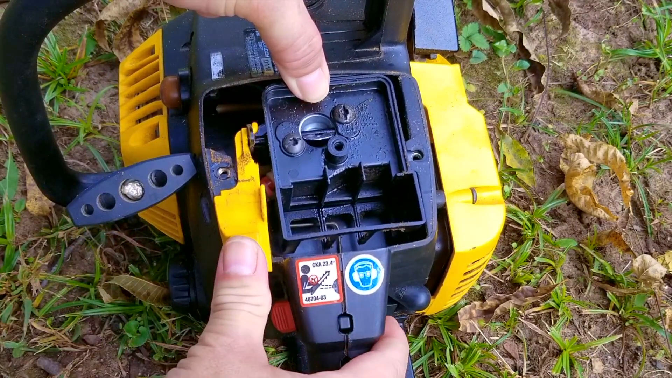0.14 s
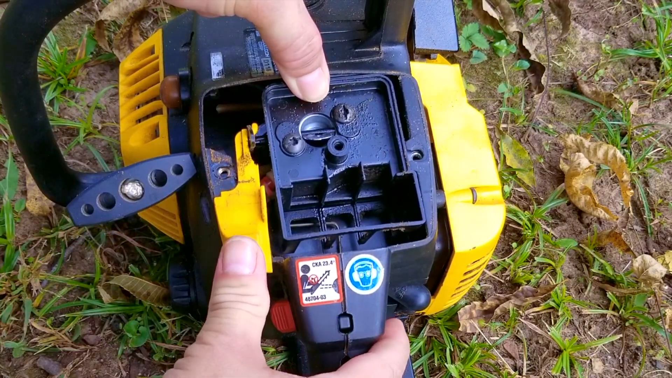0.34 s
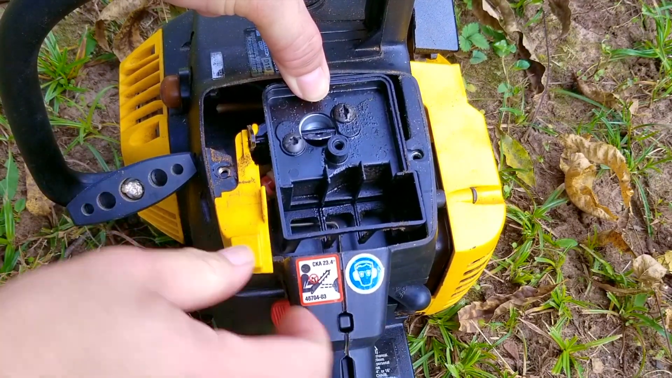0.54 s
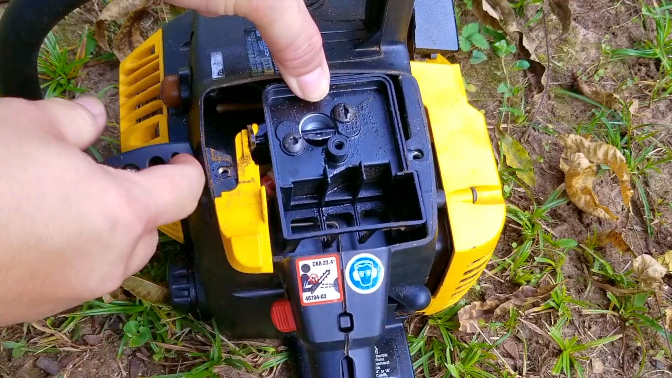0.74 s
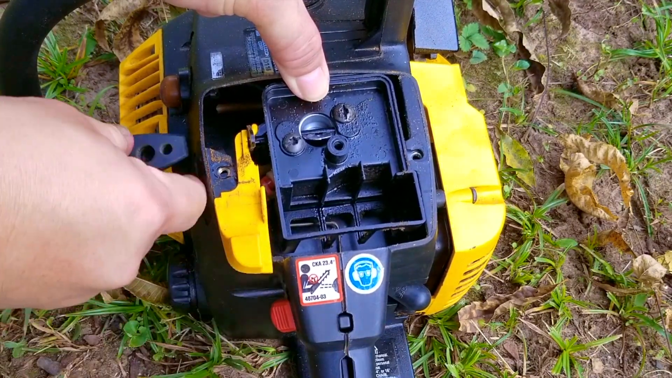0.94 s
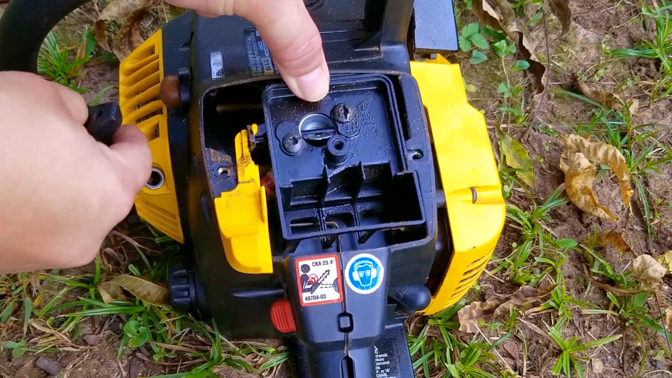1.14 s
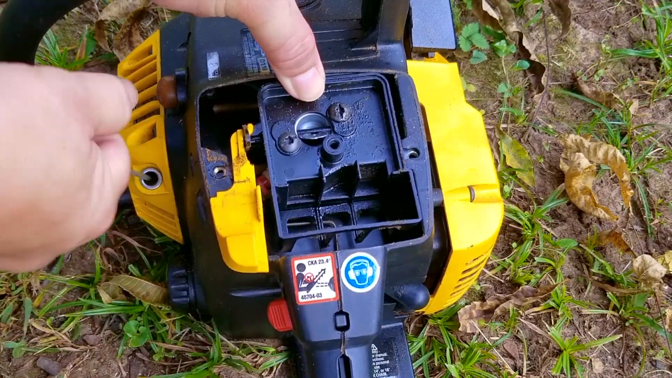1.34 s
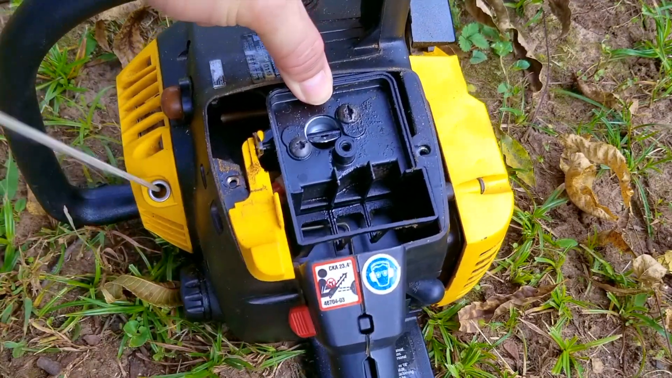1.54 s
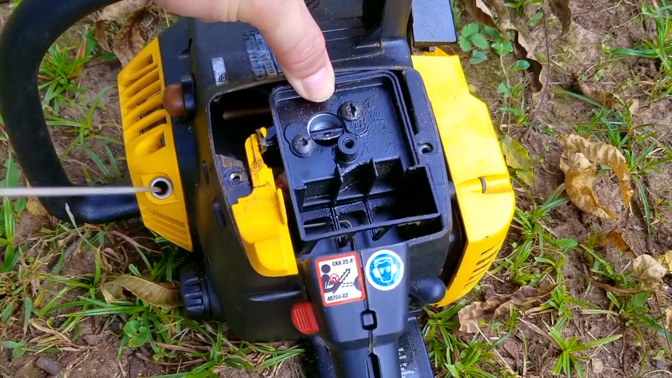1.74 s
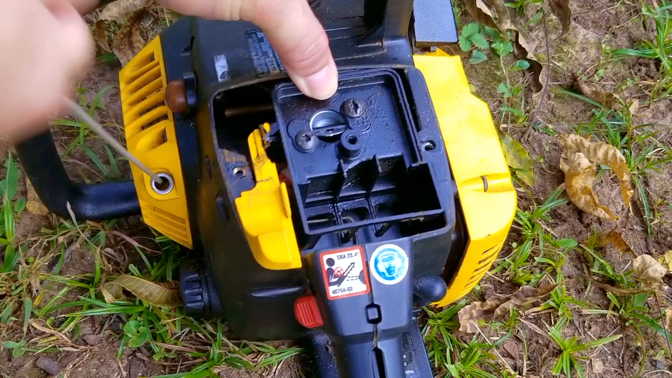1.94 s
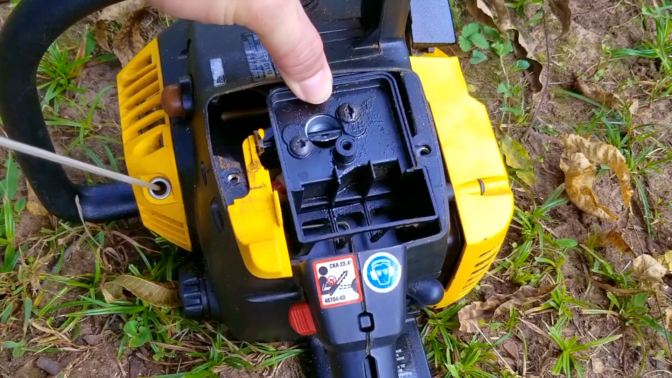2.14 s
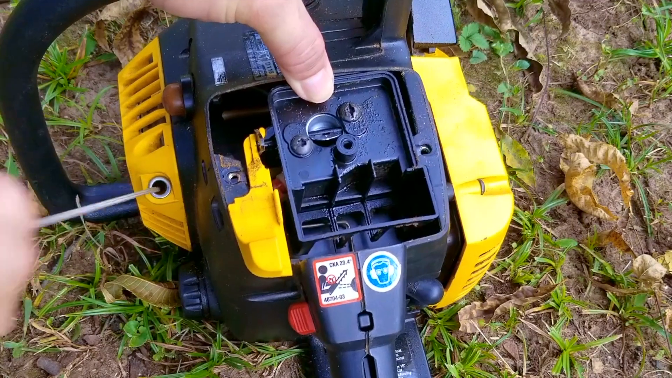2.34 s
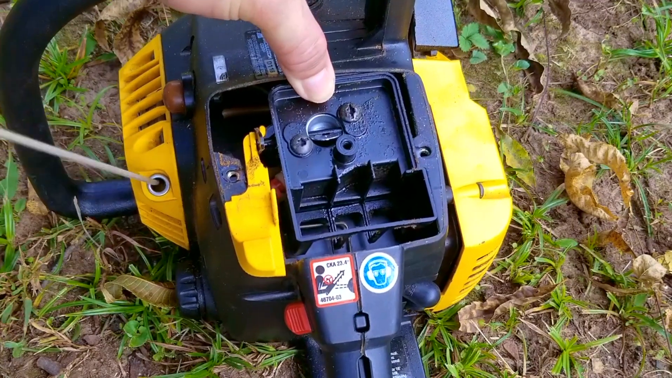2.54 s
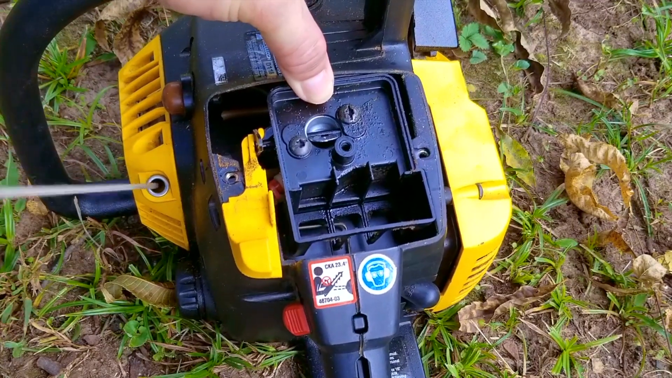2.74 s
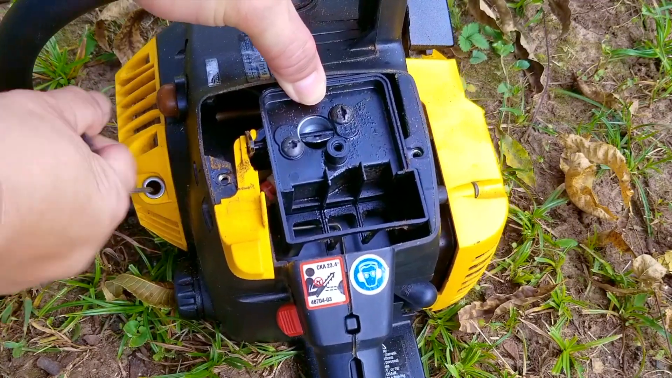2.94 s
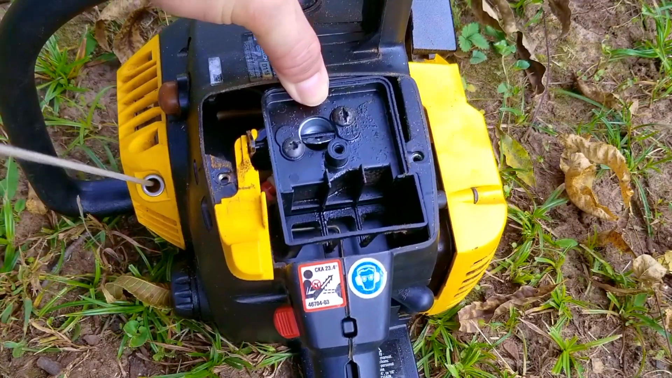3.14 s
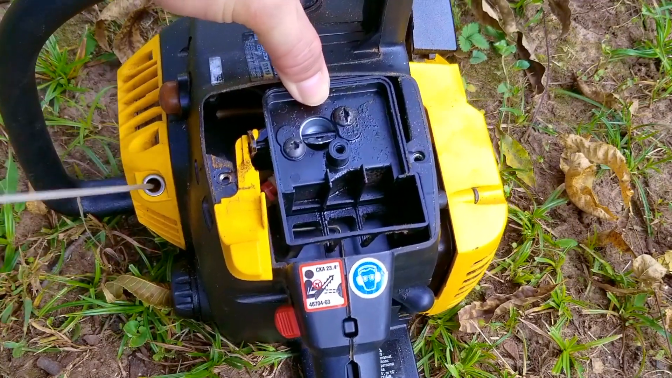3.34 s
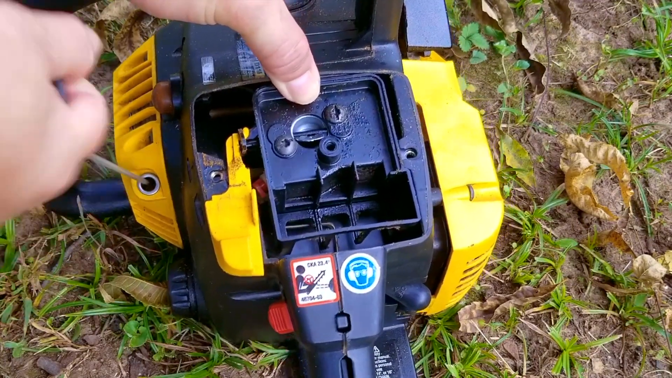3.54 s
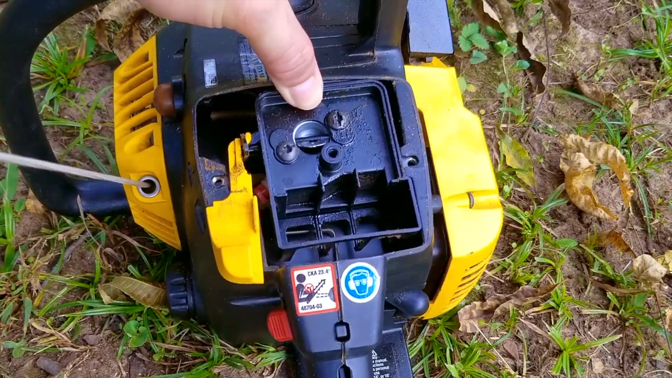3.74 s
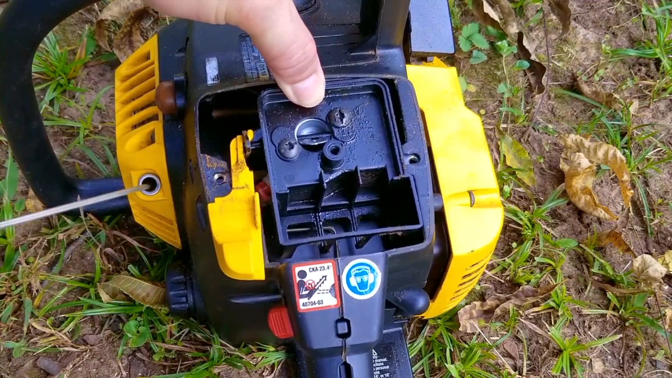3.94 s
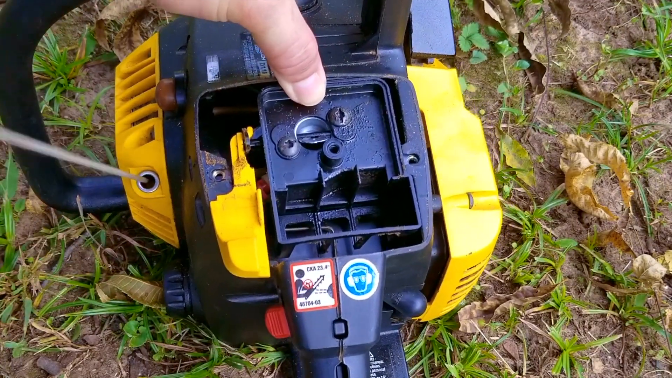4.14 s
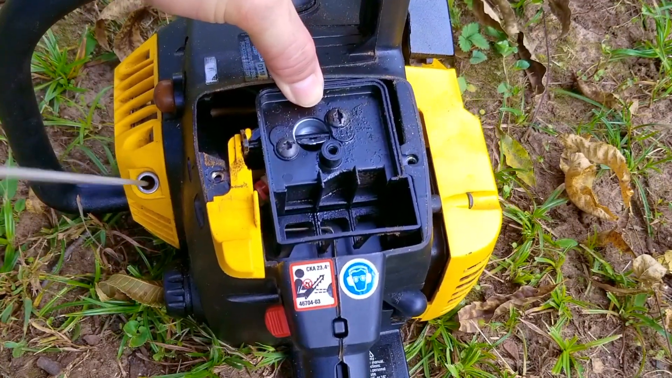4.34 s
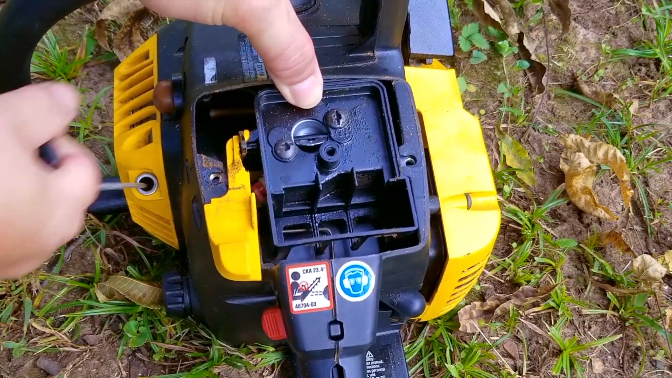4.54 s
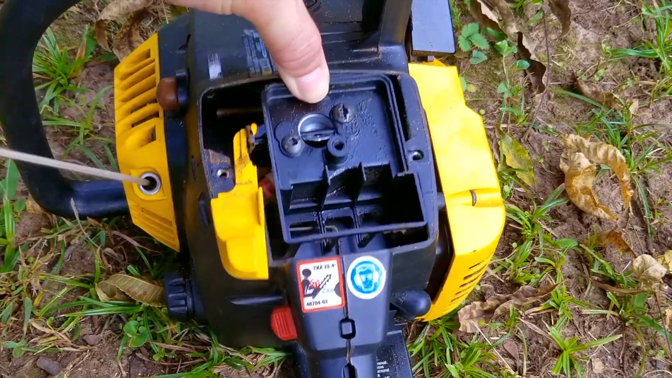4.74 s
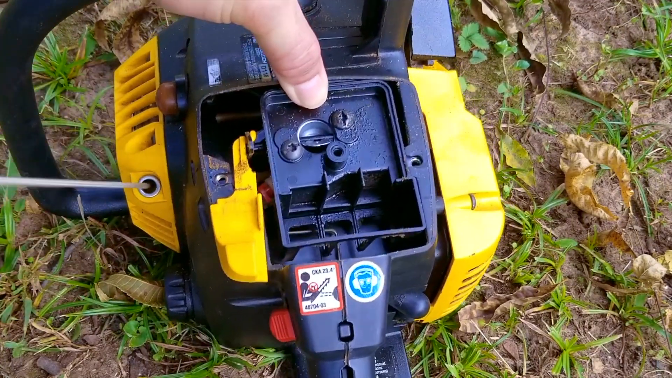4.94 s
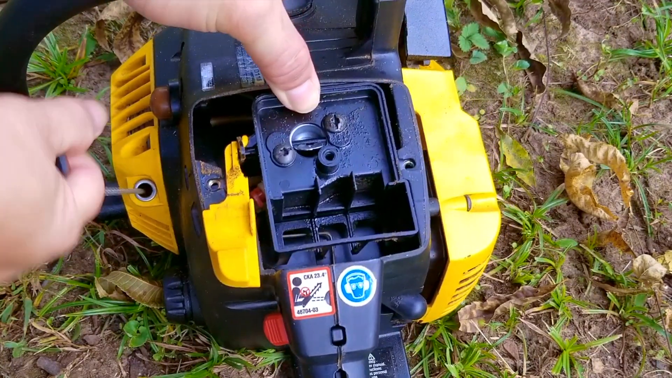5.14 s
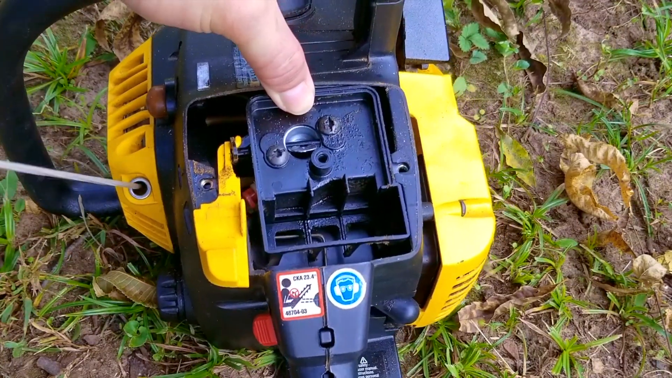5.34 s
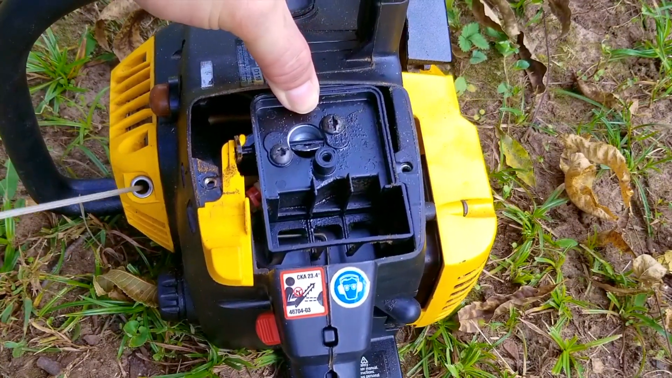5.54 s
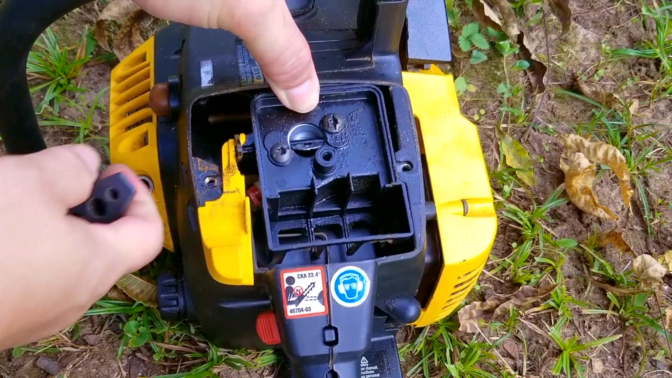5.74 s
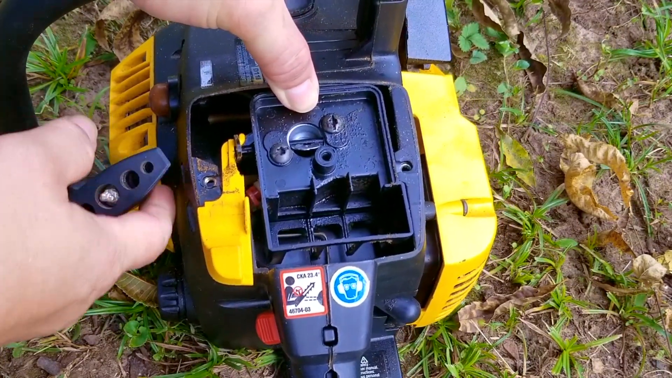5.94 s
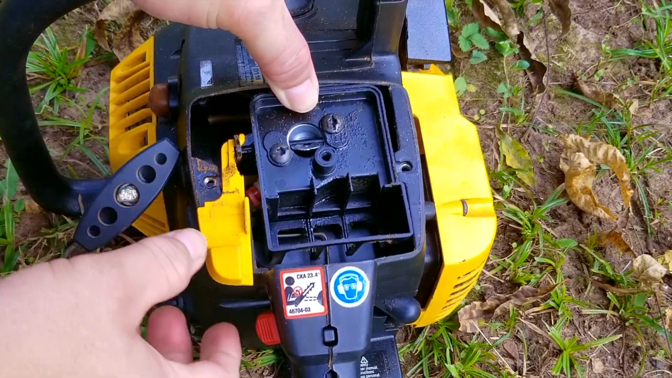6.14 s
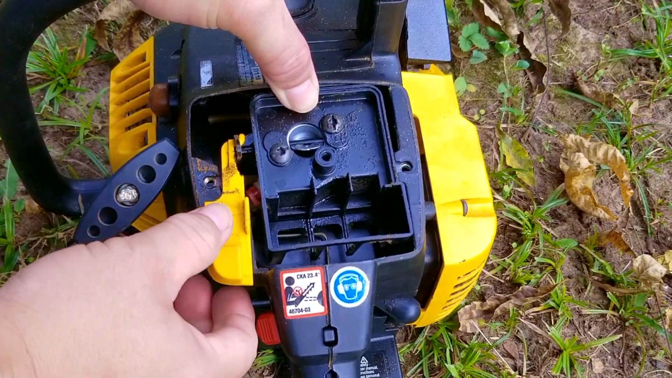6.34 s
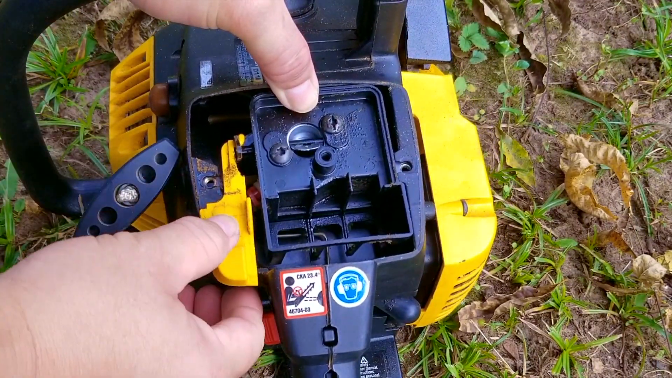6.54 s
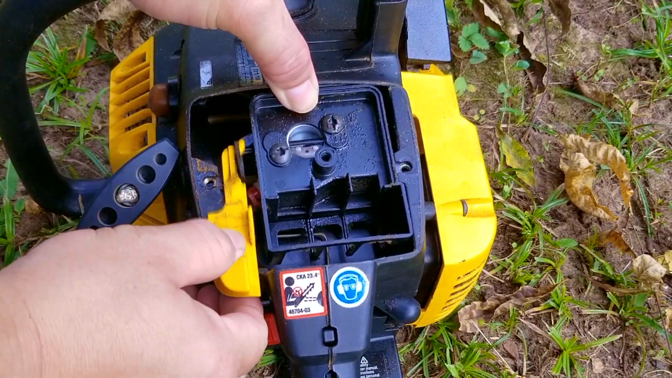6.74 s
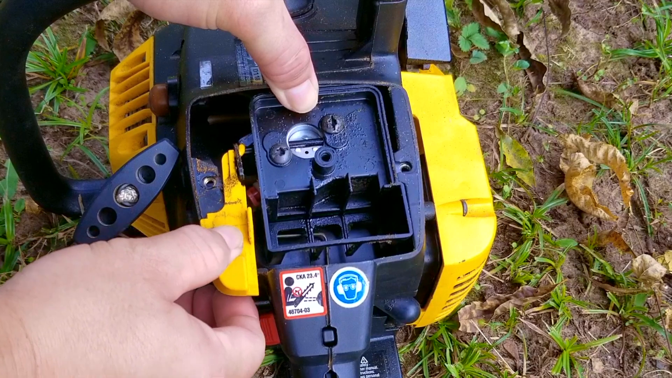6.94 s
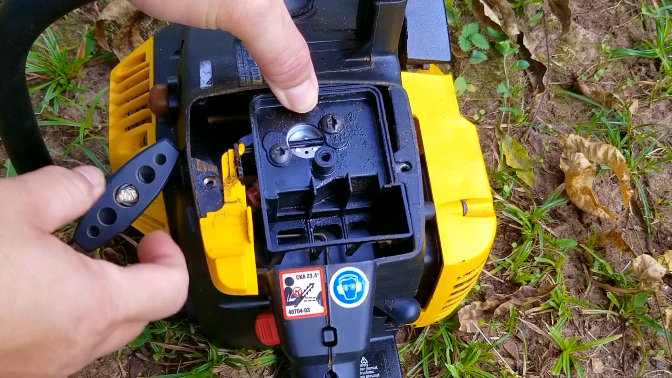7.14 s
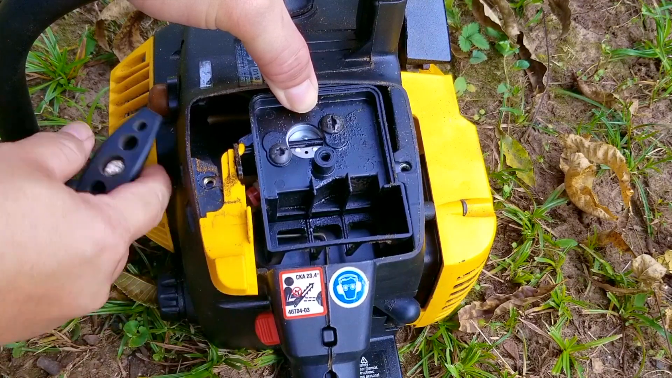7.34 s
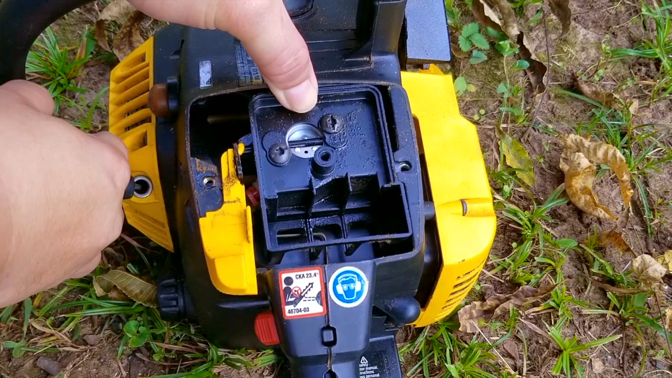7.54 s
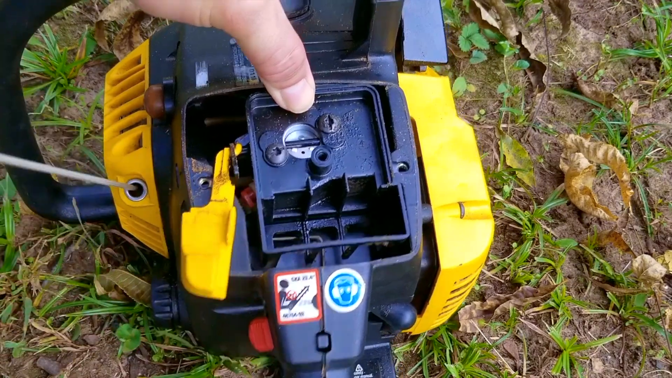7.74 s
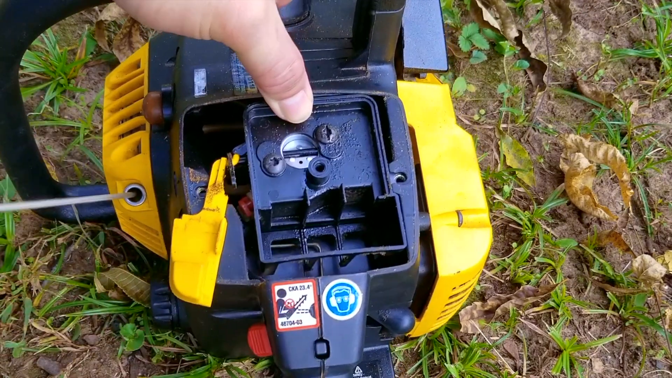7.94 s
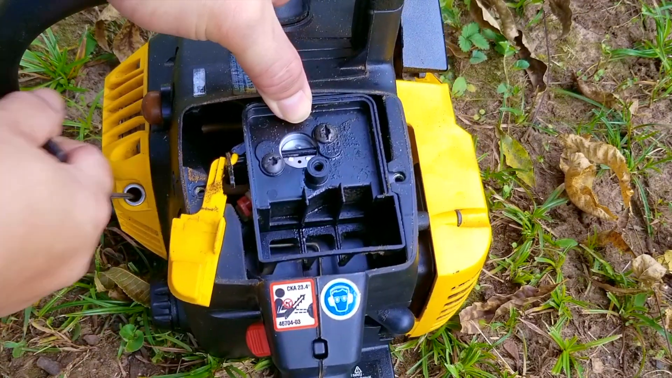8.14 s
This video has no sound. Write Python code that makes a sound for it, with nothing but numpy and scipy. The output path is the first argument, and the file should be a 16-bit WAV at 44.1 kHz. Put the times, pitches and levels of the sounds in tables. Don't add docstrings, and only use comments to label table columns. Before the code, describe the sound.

Close outdoors, a small two-stroke engine is cranked by a pull cord. After a quiet second, eight rapid pulls come about half a second apart, each a knock, then a slowing run of dull thuds and sharp airy puffs, then a rasping, ticking cord rewind. It never fires. A pause, a crisp plastic lever snap, then two more pulls. Faint traffic rumble; engine strongly to the left.

```python
import sys
import numpy as np
from scipy import signal
from scipy.fft import rfft, irfft, next_fast_len
from scipy.io import wavfile
from scipy.ndimage import uniform_filter1d

SR = 44100
rng = np.random.default_rng(int(sys.argv[2]) if len(sys.argv) > 2 else 0)


def convert_level_to_amplitude(level_db):
    exponent = np.asarray(level_db, float) / 20
    return 10 ** exponent


def wav_record(signal):
    frames = np.transpose(np.atleast_2d(signal))
    bounded = np.clip(frames, -1, 1)
    quanta = np.round(bounded * 32767).astype(np.int16)
    wavfile.write(sys.argv[1], SR, quanta)


N = 365588

# start_s [s], thud_db [dB], intake_ring_db [dB], puff_db [dB], puff_length_s [s]
PULLS = [
    (1.3258, -16, -20.5, -22, 0.0077),
    (1.8817, -21, -24.5, -24, 0.0073),
    (2.4235, -22, -25.5, -25.5, 0.0076),
    (2.96, -20, -26, -22, 0.0057),
    (3.49, -20.5, -24, -23.5, 0.0074),
    (4.036, -20, -24.5, -22, 0.0061),
    (4.5838, -20, -23.5, -23, 0.0077),
    (5.132, -19.5, -23.5, -22.5, 0.007),
    (7.6035, -15.5, -31, -41, 0.053),
    (8.183, -19, -62, -43, 0.016),
]
TURN_MS = [
    (40.4, 37, 48, 60.2),
    (37.9, 37.7, 48, 58.7),
    (39, 36.1, 43.7, 59.7, 73.2),
    (38.2, 33.9, 39.9, 57.4, 66.6),
    (41.8, 33.9, 37.7, 51, 64.6),
    (39, 35.8, 37.1, 52.6, 65.2),
    (40.6, 35.9, 38.4, 53.6, 65.3),
    (42.1, 36.5, 38.2, 58.5, 66.5),
    (41, 37, 43.7, 58.6),
    (39.2, 34.6, 41),
]
# start_s [s], thud_db [dB], puff_db [dB]
BREAKAWAY = [
    (1.277, -28, -22.5),
    (1.846, -31.5, -24),
    (2.392, -31.5, -26.5),
    (2.9281, -35.5, -23.5),
    (3.452, -34.5, -28.5),
    (3.998, -34.5, -27),
    (4.5362, -40, -50),
    (5.095, -34.5, -25),
    (7.5472, -32.5, -28),
    (8.145, -32, -37),
]
# start_s [s], peak_db [dB]
LEVER = [
    (6.6672, -25.5),
    (6.681, -54),
]
# frequency_hz [Hz], level_db [dB per Hz]
PUFF_TONE = [(710, -52), (1200, -3.5), (1610, -13.5), (2200, 3), (2860, -1), (3620, 7.5), (4700, 1.5),
             (5240, 4.5), (8350, -4), (10300, -0.5), (12700, 2.5), (15700, -9), (16600, -35.5)]


def rms_one(x):
    return x / np.sqrt(np.mean(x ** 2) + 1e-20)


def bump(t, width_s):
    return np.exp(-(t / width_s) ** 2)


def add(out, s, shape):
    i = max(round(s * SR), 0)
    out[i:i + len(shape)] += shape[:N - i]


def in_time(spans, off_db):
    rows = []
    for span in spans:
        silence = [off_db] * (len(span[0]) - 1)
        rows += [(span[0][0] - .01, *silence), *span, (span[-1][0] + 0.024, *silence)]
    s, *columns = np.transpose(rows)
    return [np.interp(np.arange(N) / SR, s, c) for c in columns]


def colour(x, points, sign=1, lag_s=0.):
    size = next_fast_len(N + 4096)
    hz = np.arange(size // 2 + 1) * SR / size
    curve_hz, curve_db = np.array(points).T
    gain = convert_level_to_amplitude(sign * np.interp(np.log(hz + 1), np.log(curve_hz), curve_db))
    return irfft(rfft(x, size) * gain * np.exp(-2j * np.pi * hz * lag_s), size)[..., :N]


def drift(rate):
    r = np.exp(-2 * np.pi * rate / SR)
    return rms_one(signal.lfilter([1], [1, -2 * r, r * r], rng.standard_normal(N + 20000))[20000:])


def ring(x, hz, t60):
    r, w = convert_level_to_amplitude(-60 / (t60 * SR)), 2 * np.pi * hz / SR
    return signal.lfilter([0, np.sin(w)], [1, -2 * r * np.cos(w), r * r], x + 1e-18)


def air(tone, alike):
    near, other = colour(rng.standard_normal((2, N)), tone)
    alike = np.clip(alike, 0, 1)
    return rms_one(np.array([near, alike * near + np.sqrt(1 - alike ** 2) * other]))


def crank():
    exhaust_lag_ms = [
        (17.1, 15.4, 17.9, 24.4, 42),
        (15.8, 16.3, 17.4, 25.9, 44),
        (17.2, 15.2, 16.1, 22.7, 37.8, 48),
        (18.7, 16.9, 18.5, 20.6, 30.3, 46),
        (18.5, 15.5, 16.4, 18.7, 30.5, 46),
        (17.9, 16.7, 16.2, 18.7, 30.3, 45),
        (17.5, 16.4, 16, 18.4, 29, 45),
        (18.8, 16.9, 16.6, 19.1, 29.4, 45),
        (16, 15.5, 16, 22, 42),
        (15.5, 15.5, 16, 22),
    ]
    # start_s [s], hiss_db [dB], length_s [s]
    leaks = [(1.252, -40, 0.0033), (1.735, -33, 0.0039), (2.24, -39, 0.0038), (2.28, -33, 0.0027),
             (2.773, -36, .0036), (2.787, -46.5, 0.0029), (2.8215, -38, 0.0051), (4.49, -54, 0.0062),
             (5.007, -50, 0.0052), (5.64, -43.5, 0.0066), (7.591, -34, 0.026), (7.717, -32, 0.0074),
             (7.7746, -22, 0.0091), (7.852, -45, 0.0032), (8.026, -47, 0.013), (8.04, -52, 0.0059),
             (8.0648, -46, .005)]
    full_speed_ms, quick_lag_ms = 41.5, 15.5
    turns, jets = [], [(*leak, -120) for leak in leaks]
    for pull, ms, lag, bite in zip(PULLS, TURN_MS, exhaust_lag_ms, BREAKAWAY):
        s, thud_db, ring_db, puff_db, length_s = pull
        bite_s, bite_db, bite_puff_db = bite
        choked = s > LEVER[0][0]
        last_stretch = 1.51 if choked else 1.33
        ms = np.array([full_speed_ms, *ms, ms[-1] * last_stretch])
        shut = s + (np.cumsum(ms) - ms[0]) / 1000
        speed = np.minimum(full_speed_ms / ms, 1)
        later = np.arange(len(ms)) > 0

        thud = thud_db + (-2.4 + 1.5 * choked) * later + 1.76 * 20 * np.log10(speed)
        turns += zip(shut + .0009 * choked, thud, ring_db - 33.5 * (1 - speed), 1 - speed)

        late_ms = np.array(lag) - quick_lag_ms
        jets.append((bite_s + .0023, bite_puff_db, .0091, bite_db))
        hiss_db = puff_db + 1 * ~later[:-1] - .0089 * late_ms ** 2
        jet_s = length_s * np.where(later[:-1], 1, 0.9)
        push_db = thud_db - 5.5 - 5.5 * choked - .52 * late_ms
        jets += zip(shut[:-1] + np.array(lag) / 1000, hiss_db, jet_s, push_db)
    return [[row for row in sorted(rows) if row[0] < N / SR] for rows in (turns, jets)]


def thuds():
    # mode_hz [Hz], level_db [dB], t60_s [s]
    case_modes = [(208.6, -9, 0.35), (259.7, -1.5, 0.039), (381, -1.5, 0.024), (1300, 1, 0.023),
                  (2168, 18.5, 0.017)]
    t = np.arange(-500, 1100) / SR
    pile = 1.15 * np.clip((t + .0027) / .0023, 0, 1) ** 1.3 * np.clip(-t / .0004, 0, 1)
    pile -= 0.1 * bump(t + .0032, .0007)
    rebound = -.95 * bump(t - .0011, .0013) * np.clip(t / .0003, 0, 1)
    swing = 0.24 * np.sin(2 * np.pi * 83 * (t - .0029)) * (t > .0029) * bump(t - .006, .0105)
    bounce_s = .0036
    bounce = 1.5 * (bump(t - bounce_s, .0008) - .7 * bump(t - 1.5 * bounce_s, .001))

    suck = -.55 * np.where(t < -.004, bump(t + .004, .0026), bump(t + .004, .0008))
    notch = 1.0 * bump(t + .001, .00045)
    heave = .7 * np.clip(t / .001, 0, 1) * np.exp(-np.maximum(t - .001, 0) / .002)
    port = suck - notch + heave

    jolt = np.diff(np.hanning(60), prepend=0) * 0.97
    turns, jets = crank()
    out, shocks, necks = np.zeros((3, N))
    for s, thud_db, _, slow in turns:
        pressure = pile + rebound + (1 + 1.6 * slow) * swing + slow * bounce
        add(out, s + .00033 + t[0], convert_level_to_amplitude(thud_db - 2.5) * pressure)
        add(shocks, s, convert_level_to_amplitude(0.6 * thud_db - 22.5) * jolt)
    for s, _, _, push_db in jets:
        add(out, s + t[0], convert_level_to_amplitude(push_db) * port)
        add(necks, s - .0016, -convert_level_to_amplitude(push_db - 24.5) * np.hanning(24))

    out = signal.sosfilt(signal.butter(1, 2200, fs=SR, output="sos"), out)
    case = sum(convert_level_to_amplitude(db + 2.5 * drift(36.0)) * ring(shocks, hz, t60) for hz, db, t60 in case_modes)
    return out * convert_level_to_amplitude(1.0 * drift(110)) + case + ring(necks, 740, 0.011)


def intake():
    tone, gulp = np.zeros(N), np.zeros(N)
    turns = crank()[0]
    gaps = np.diff(np.array(turns)[:, 0], prepend=0, append=99)
    open_s = np.clip(.205 * np.minimum(gaps[:-1], gaps[1:]), .004, .012)
    chances = rng.standard_normal((len(turns), 2))
    for (s, thud_db, ring_db, slow), length, chance in zip(turns, open_s, chances):
        t = np.arange(round((length + 0.034) * SR)) / SR
        hz = 785 * (1 + .025 * chance[0]) * (1 - (1.8 + .8 * chance[1]) * t)
        fade = np.exp(-t / .016) * (1 - np.exp(-t / .0008))
        choke = np.clip((length + .0003 - t) / .002, .12, 1)
        wave = np.sin(2 * np.pi * hz * t) + 0.18 * np.sin(2 * np.pi * 1.7 * hz * t)
        add(tone, s - length - .0008, -convert_level_to_amplitude(ring_db + 1.0) * fade * choke * wave)
        gulp_gain = convert_level_to_amplitude(ring_db - 1.0) + slow * convert_level_to_amplitude(thud_db - 15)
        gulp_shape = np.exp(-t / 0.0064) * (1 - np.exp(-t / 0.00017))
        add(gulp, s - length - .001, gulp_gain * gulp_shape)
    noise = air(PUFF_TONE, alike=1.0)
    noise = signal.sosfilt(signal.butter(2, 2800, fs=SR, output="sos"), noise)
    return tone * convert_level_to_amplitude(2.0 * drift(470)) + gulp * noise


def puffs():
    band_edges_hz = (600, 1400, 2000, 2800, 4000, 5600, 8000, 12000, 17000)
    level = np.zeros(N)
    for s, hiss_db, length_s, _ in crank()[1]:
        t = np.arange(round(length_s * 5 * SR)) / SR
        rise = 1 - np.exp(-(t / .0014) ** 1.5)
        fall = bump(t, 0.89 * length_s) + 0.069 * np.exp(-t / (2.7 * length_s))
        add(level, s - .0006, convert_level_to_amplitude(hiss_db - 0.5) * rise * fall)

    hiss = air(PUFF_TONE, alike=0.7)
    patchy = 0
    for edge in zip(band_edges_hz, band_edges_hz[1:]):
        band = signal.butter(2, edge, "band", fs=SR, output="sos")
        patchy = patchy + convert_level_to_amplitude(1.6 * drift(25)) * signal.sosfilt(band, hiss)
    hiss = rms_one(patchy)
    jet = level * convert_level_to_amplitude(0.8 * drift(260)) * 2.6 * np.tanh(hiss / 2.6)
    return jet + convert_level_to_amplitude(-36.5) * ring(jet, 3560, 0.0089)


def rocking():
    # start_s [s], level_db [dB]
    rests = [(1.664, -50), (1.705, -40), (2.209, -45.5), (2.263, -43), (2.726, -42.5), (3.369, -42),
             (3.886, -46), (3.932, -48), (4.44, -48.5), (4.993, -43), (2.9, -42), (5.03, -45), (5.565, -47),
             (5.61, -47), (7.955, -44), (8.016, -52)]
    push = np.zeros(N)
    rocks = rests + [(s - .002, thud_db - 3) for s, thud_db, _ in BREAKAWAY]
    rocks += [(s + sum(ms) / 1000 + .037, thud_db - 22.5) for (s, thud_db, *_), ms in zip(PULLS[:-1], TURN_MS)]
    for (s, rock_db), noise in zip(rocks, rng.standard_normal((len(rocks), 900))):
        add(push, s - .008, convert_level_to_amplitude(rock_db - 17) * np.hanning(900) * noise)
    return ring(push, 385, 0.026) + convert_level_to_amplitude(-6) * ring(push, 750, 0.036)


def cord():
    # time_s [s], rasp_db [dB]
    haul_tables = [
        [(1.53, -53.5), (1.546, -60), (1.558, -58), (1.564, -55), (1.622, -45.5), (1.742, -59.5), (1.78, -66)],
        [(2.07, -62.5), (2.102, -56), (2.11, -48.5), (2.226, -53), (2.286, -63), (2.302, -74), (2.335, -72)],
        [(2.6, -64), (2.634, -53), (2.64, -52), (2.716, -50.5), (2.828, -61.5), (2.834, -67), (2.86, -65)],
        [(3.2, -52), (3.244, -61.5), (3.25, -49.5), (3.37, -51.5), (3.405, -69)],
        [(3.71, -58.5), (3.756, -54), (3.772, -52), (3.826, -47), (3.888, -51.5), (3.955, -71.5)],
        [(4.26, -56.5), (4.366, -48.5), (4.446, -52.5), (4.486, -65.5), (4.494, -50), (4.52, -69), (4.53, -67)],
        [(4.82, -56), (4.826, -46.5), (4.836, -56.5), (4.882, -47.5), (5.006, -52), (5.018, -63), (5.05, -72)],
        [(5.37, -56), (5.48, -48), (5.572, -55), (5.628, -68), (5.64, -62.5), (5.652, -83), (5.7, -92.5)],
        [(7.8, -56.5), (7.82, -55.5), (7.874, -45), (8.048, -54.5), (8.052, -66), (8.092, -74), (8.095, -58)],
    ]
    # time_s [s], rasp_db [dB], rattle_db [dB]
    stroke = [
        (-.035, -60, -57.5),
        (.012, -48, -50.5),
        (.065, -50.5, -47.5),
        (.17, -47.5, -52.5),
    ]
    # time_s [s], rasp_db [dB], rattle_db [dB]
    take_up = [
        (-.12, -87, -88),
        (-.09, -60, -69),
    ]
    rest_s = 1
    spans, home_s = [], -rest_s
    for (s, thud_db, *_), haul in zip(PULLS, [*haul_tables, []]):
        if s - home_s > rest_s:
            spans.append([(s + dt, rasp, rattle) for dt, rasp, rattle in take_up])
        hard_db = 0.61 * (thud_db + 15.5)
        spans[-1] += [(s + dt, rasp + hard_db, rattle + hard_db) for dt, rasp, rattle in stroke]
        spans[-1] += [(at, db + 2, -57.5 + 0.45 * (db + 50)) for at, db in haul]
        home_s = spans[-1][-1][0]
    return in_time([sorted(span) + [(span[-1][0] + 0.051, -96, -96)] for span in spans], -110)


def pawls():
    # start_s [s], end_s [s], first_rate [ticks per s], last_rate [ticks per s]
    windings = [
        (1.561, 1.721, 112, 73),
        (2.113, 2.241, 270, 57),
        (2.65, 2.769, 144, 91),
        (3.248, 3.406, 180, 90),
        (3.77, 3.932, 103, 70),
        (4.301, 4.458, 200, 90),
        (4.862, 4.999, 120, 75.3),
        (5.403, 5.606, 102, 75),
        (7.842, 8.021, 164, 70),
    ]
    out = np.zeros(N)
    for start, end, first, last in windings:
        i, j = round(start * SR), round(end * SR)
        done = np.linspace(0, 1, j - i)
        rate = first + (last - first) * done ** 2
        turn = np.cumsum(rate[::-1])[::-1] / SR
        out[i:j] = (5 + 6 * done) * (.5 - (-turn) % 1)
    return uniform_filter1d(out, size=40)


def starter():
    # frequency_hz [Hz], level_db [dB per Hz]
    rasp_tone = [(530, -38), (900, -15), (1340, -14.5), (1920, -20), (2500, -5.5), (3640, -5), (4150, -2),
                 (6720, -5), (7050, -3.5), (7400, -5.5), (7800, -3.5), (9880, -3.5), (16000, -10)]
    # frequency_hz [Hz], level_db [dB per Hz]
    rattle_tone = [(88, -64.5), (150, 9.5), (205, -7.5), (364, -4), (707, 2.5), (1120, -8), (1340, -4),
                   (2200, -11.5), (2860, -30.5), (4840, -120)]
    # mode_hz [Hz], width_hz [Hz], level_db [dB]
    spring_modes = [(2640, 47, -39), (3420, 100, -30.5), (4290, 74, -29), (5830, 130, -37.5),
                    (6410, 99, -35), (6830, 66, -26.5), (9050, 200, -36)]
    rasp_db, rattle_db = cord()
    ticks_db = pawls()
    winding = uniform_filter1d(1. * (ticks_db != 0), size=1500)
    grain_db = ticks_db + 1.7 * drift(150) + .9 * drift(25)
    rasp = air(rasp_tone, alike=0.11)
    for hz, width_hz, ring_db in spring_modes:
        mode_db = ring_db + 19 * winding - 10 + 6.5 * drift(20)
        rasp = rasp + convert_level_to_amplitude(mode_db) * rms_one(ring(rasp, hz, 1.4 / width_hz))
    rattle = convert_level_to_amplitude(2.5 * drift(40)) * air(rattle_tone, alike=.8)
    return convert_level_to_amplitude(rasp_db + 6.0 + grain_db) * rasp + convert_level_to_amplitude(rattle_db + 6.5) * rattle


def knocks():
    # start_s [s], peak_db [dB], ring_hz [Hz], bright_db
    # [dB], hollow_db [dB]
    hard_blows = [(0.582, -70, 1510, 8, 9), (0.634, -63, 1400, -8, 6), (1.22, -35, 1410, 2, -7.5),
                  (1.254, -32, 1300, -31, -5), (1.79, -23.5, 3020, 2.5, -13.5), (2.343, -26, 3940, 0, -7.5),
                  (2.866, -30.5, 1540, -2, -30), (3.414, -23, 3580, -5, -21), (3.965, -18.5, 2230, -4, -47),
                  (4.542, -24.5, 3550, 2, -28), (5.058, -20, 2320, -4.5, -19), (5.745, -43.5, 3400, 2, -18),
                  (5.756, -60, 1580, -4, 3.5), (5.909, -48, 1040, -21.5, -8),
                  (5.934, -61.5, 1774, -10, -5.5), (7.501, -40, 1810, 0, -11.5),
                  (7.511, -34, 1520, 4.5, -7.5), (7.521, -49.5, 1530, -5.5, -22),
                  (8.101, -22.5, 3900, -2, -16), (8.2505, -33, 2170, -15, -25)]
    # start_s [s],
    # peak_db [dB], ring_hz [Hz]
    small_taps = [(1.6, -49, 2600), (1.6561, -41.5, 1350), (2.1392, -44, 2600), (2.2119, -48, 1460),
                  (2.6698, -53, 1320), (2.7665, -48.5, 1190), (2.8773, -44.5, 980), (3.8275, -46, 2550),
                  (3.8896, -51, 2310), (4.346, -41, 2190), (4.445, -43, 2300), (4.9494, -54, 2560),
                  (5.435, -42, 2500), (5.456, -45, 1040), (5.507, -46.5, 1350), (5.5705, -47, 2390),
                  (5.5962, -48, 1360), (7.5972, -37.5, 1130), (7.6376, -36, 1050), (7.676, -37, 1350),
                  (7.551, -39, 1490), (7.779, -32, 1270), (7.7124, -43, 1350), (7.864, -41, 1210),
                  (7.8836, -43, 2490), (7.9574, -44.5, 1480), (8.1736, -39, 1310), (8.2167, -51, 950)]
    # mode_hz [Hz], level_db [dB], t60_s [s]
    lever_modes = [(1700, -13, .010), (1900, -11, .014), (2400, -20, .006), (4680, -11, .010),
                   (5540, -9, .010), (6900, -24, .006), (8490, -11, .007), (9600, -19, .005),
                   (10860, -12, .007), (12450, 3, .0045), (13050, 3, .0045), (14670, -3, .007),
                   (15500, -10, .005)]
    out, t = np.zeros(N), np.arange(3000) / SR
    blows = hard_blows + [(s, db + 10, hz, -13, -38) for s, db, hz in small_taps]
    noises = rng.standard_normal((len(blows), 3000))
    for (s, peak_db, hz, bright_db, hollow_db), noise in zip(blows, noises):
        crack = noise * (1 - np.exp(-t / .0006)) * (np.exp(-t / .004) + .2 * np.exp(-t / .014))
        bright = np.diff(crack, prepend=0)
        plastic = ring(crack, hz, .0035) + .9 * ring(crack, 1.6 * hz, .003) + .25 * ring(crack, .66 * hz, .006)
        hollow = ring(crack, 770, .03)
        bright, plastic, hollow = [p / np.abs(p).max() for p in (bright, plastic, hollow)]
        add(out, s - .0006, convert_level_to_amplitude(peak_db - 1.5) * (plastic + convert_level_to_amplitude(bright_db) * bright + convert_level_to_amplitude(hollow_db) * hollow))

    for s, peak_db in LEVER:
        crack = (t == 0) + .035 * rng.standard_normal(3000) * np.exp(-t / 0.003)
        snap = 0
        for k, (hz, db, t60) in enumerate(lever_modes):
            snap = snap + convert_level_to_amplitude(db) * ring(crack, hz, t60) * (-1) ** k
        snap = signal.sosfilt(signal.butter(2, 800, "high", fs=SR, output="sos"), snap)
        add(out, s, convert_level_to_amplitude(peak_db + 5.0) * snap / np.abs(snap).max())
    return out


def hands():
    # time_s [s], level_db [dB]
    brushing = [
        [(0.0, -71), (0.08, -93), (0.148, -99), (0.281, -93), (0.359, -84), (0.529, -98), (0.64, -90),
         (0.69, -91), (0.76, -93), (1.169, -92)],
        [(5.67, -80.5), (5.741, -85), (5.757, -64.5), (5.775, -79)],
        [(5.802, -90), (6.156, -100), (6.613, -100), (6.693, -80), (6.785, -90.5), (6.974, -95.5), (7.15, -86),
         (7.327, -81), (7.469, -82)],
    ]
    # frequency_hz [Hz], level_db [dB per Hz]
    skin_tone = [(500, -19.5), (1300, -4), (2300, -3), (3000, -8), (4300, -7.5), (5000, -3.5), (5900, -11),
                 (8900, -6), (12000, -6), (16000, -15)]
    return convert_level_to_amplitude(in_time(brushing, -120)[0] + 5.0 + .8 * drift(12)) * air(skin_tone, alike=0.55)


def outdoors():
    # time_s [s], rumble_db [dB], wash_db [dB]
    ambience = [(0.1, -66.5, -76.5), (0.4, -69, -74), (0.7, -68, -74), (0.999, -67, -75),
                (5.999, -69, -78.5), (6.3, -70, -76.5), (6.6, -66.5, -73), (6.899, -67, -72),
                (7.149, -66, -72), (7.3, -64, -69)]
    # frequency_hz [Hz], level_db [dB per Hz]
    traffic_tone = [(15, -8), (25, -7), (54, -6), (113, -2.5), (150, -8.5), (183, -8.5), (260, -26.5),
                    (340, -41.5), (570, -120)]
    # frequency_hz [Hz], level_db [dB per Hz]
    wash_tone = [(150, -29.5), (260, 4.5), (373, 5), (648, -11), (797, -12), (1920, -14.5), (2950, -28),
                 (14400, -35), (16000, -40.5)]
    # frequency_hz [Hz], loss_db [dB]
    right_far_loss = [(100, 14), (400, 19), (2000, 14), (5000, 4)]
    s, *levels = np.transpose(ambience)
    rumble_db, wash_db = [np.interp(np.arange(N) / SR, s, c) for c in levels]
    rumble = convert_level_to_amplitude(rumble_db + 6.0 + 1.2 * drift(4)) * air(traffic_tone, alike=.9)
    wash = convert_level_to_amplitude(wash_db + 3.0 + 1.0 * drift(13)) * air(wash_tone, alike=0.41)
    left, right = rumble + wash
    return np.array([left, colour(right, right_far_loss, sign=-1.04)])


def scene():
    # frequency_hz [Hz], loss_db [dB]
    right_near_loss = [(60, 14.3), (400, 12.8), (1300, 11), (4400, 17), (8000, 26), (15000, 23)]
    left, right = thuds() + intake() + knocks() + puffs() + starter() + hands() + rocking()
    engine = np.array([left, colour(right, right_near_loss, sign=-1, lag_s=.00009)])
    return engine + outdoors()


def top_cut(x):
    return signal.sosfilt(signal.butter(12, 16980, fs=SR, output="sos"), x)


def record(dry):
    mix = signal.sosfiltfilt(signal.butter(2, 40, "high", fs=SR, output="sos"), dry)
    mix = signal.sosfilt(signal.cheby2(10, 50, 16950, fs=SR, output="sos"), mix)
    return top_cut(mix)


dry = scene()
out = record(dry)
wav_record(out)
```